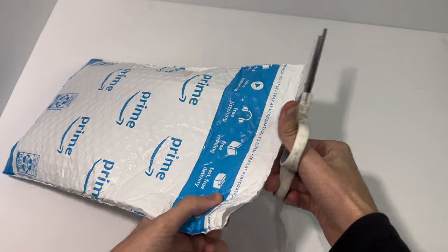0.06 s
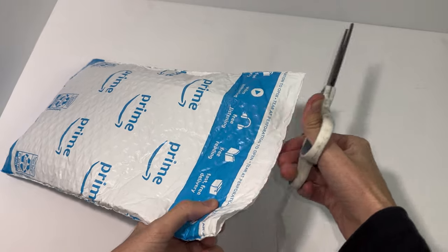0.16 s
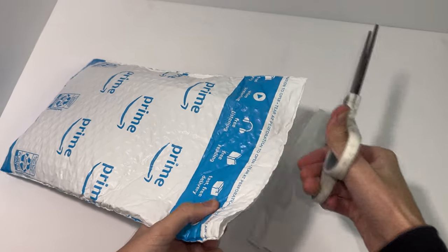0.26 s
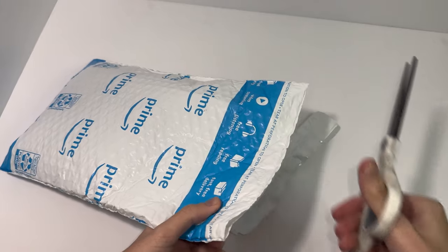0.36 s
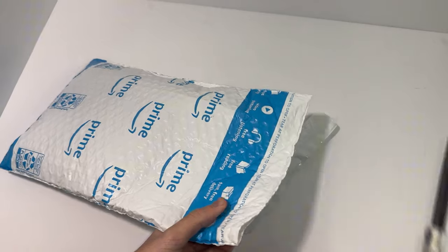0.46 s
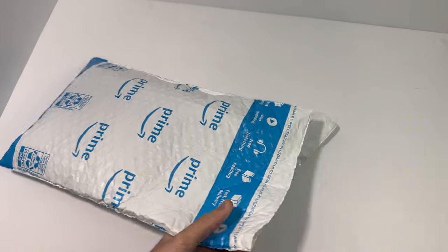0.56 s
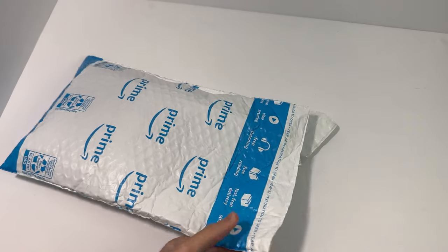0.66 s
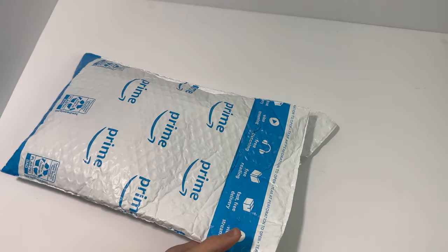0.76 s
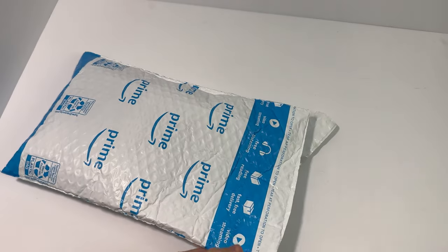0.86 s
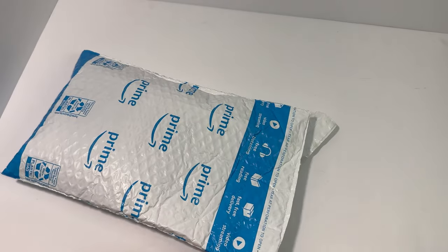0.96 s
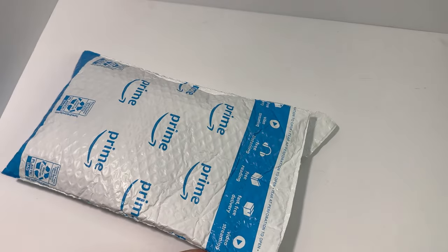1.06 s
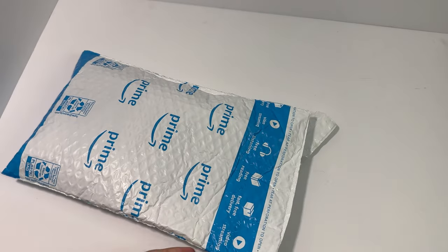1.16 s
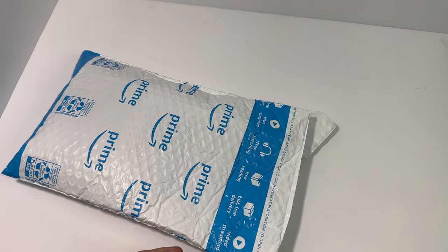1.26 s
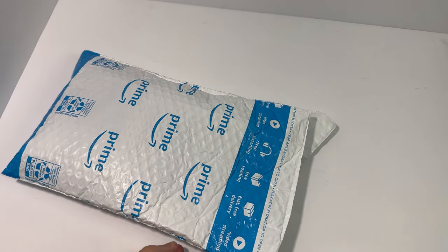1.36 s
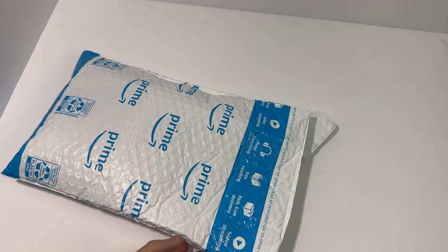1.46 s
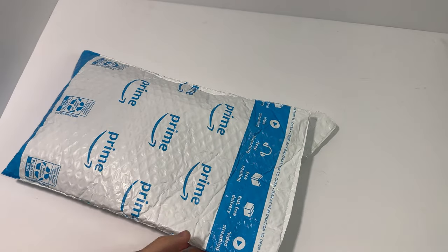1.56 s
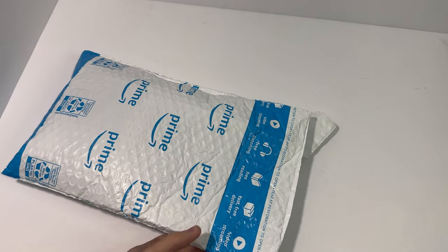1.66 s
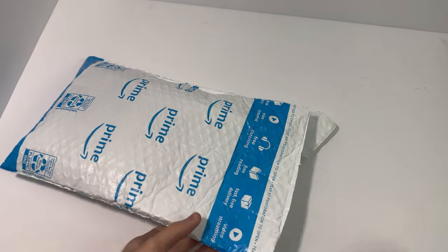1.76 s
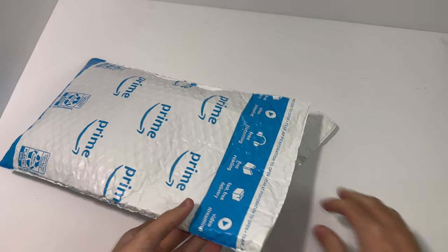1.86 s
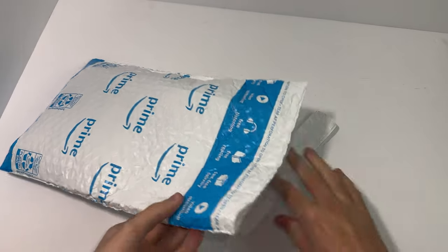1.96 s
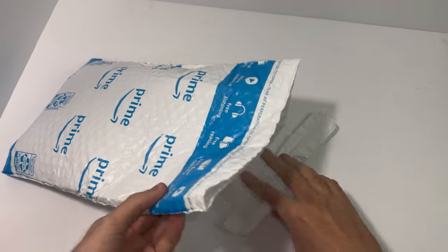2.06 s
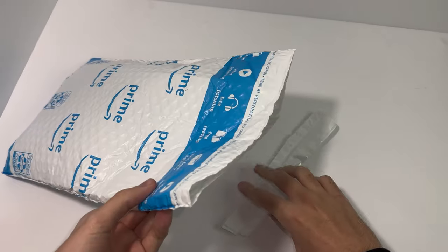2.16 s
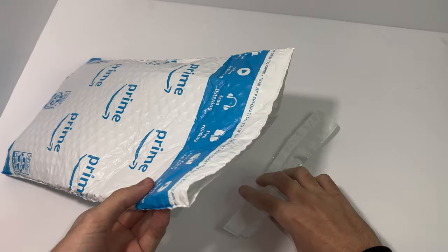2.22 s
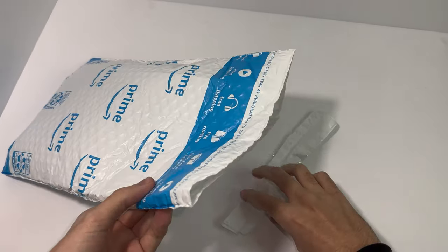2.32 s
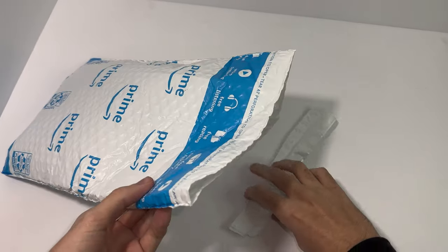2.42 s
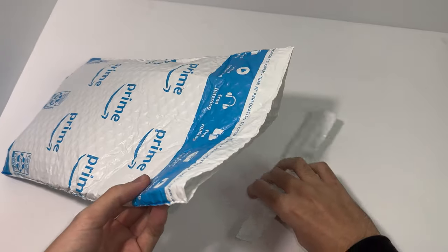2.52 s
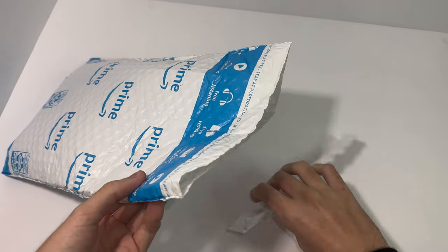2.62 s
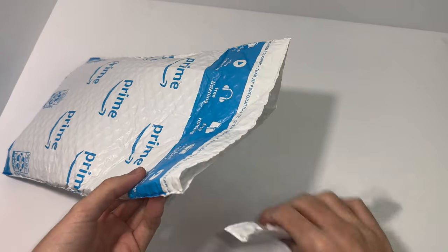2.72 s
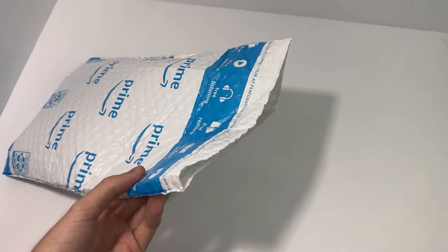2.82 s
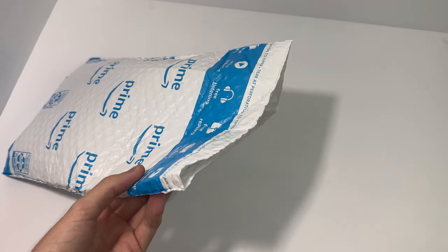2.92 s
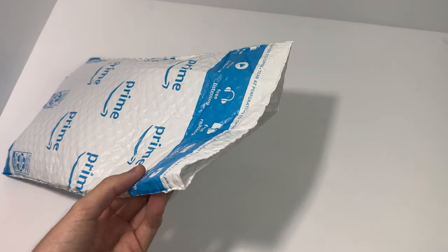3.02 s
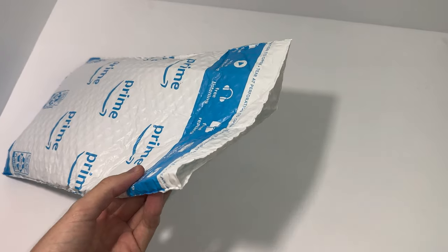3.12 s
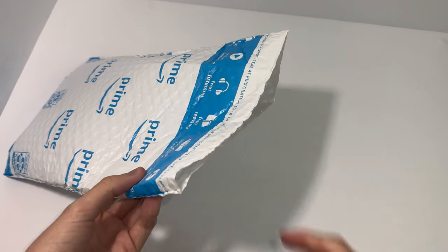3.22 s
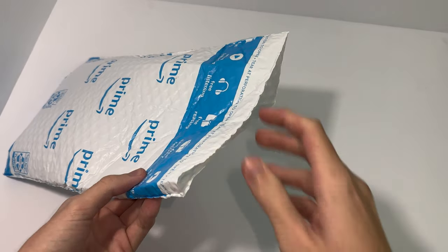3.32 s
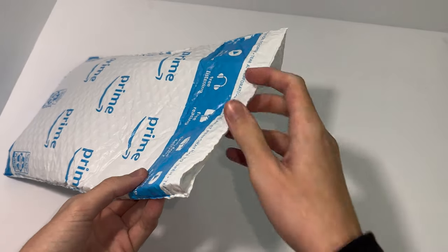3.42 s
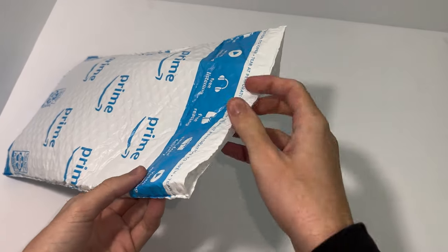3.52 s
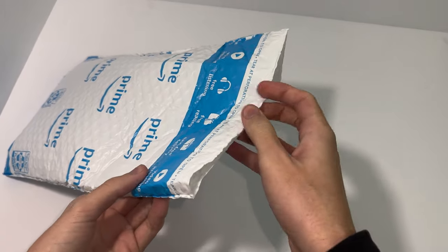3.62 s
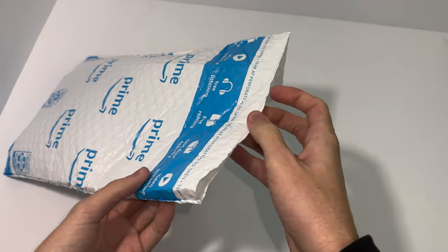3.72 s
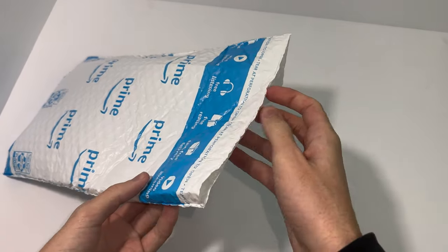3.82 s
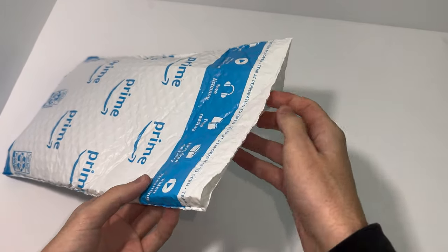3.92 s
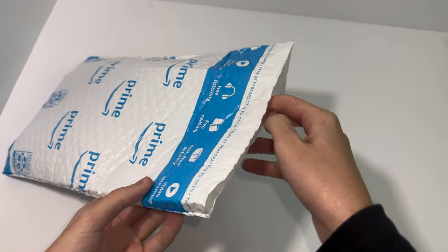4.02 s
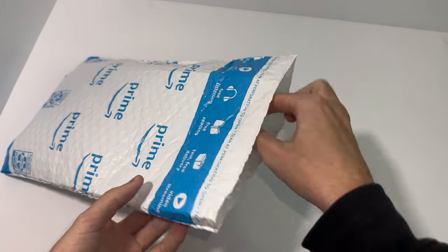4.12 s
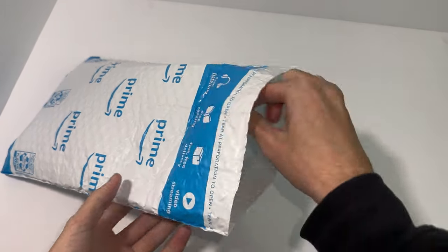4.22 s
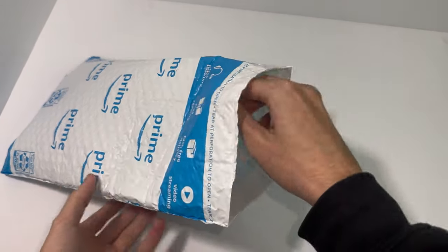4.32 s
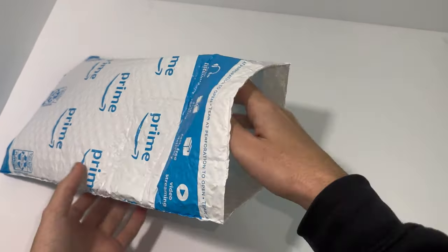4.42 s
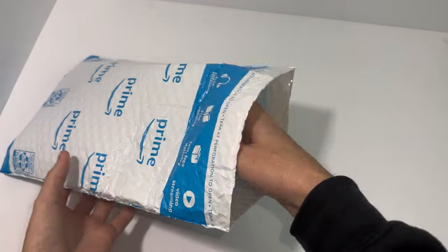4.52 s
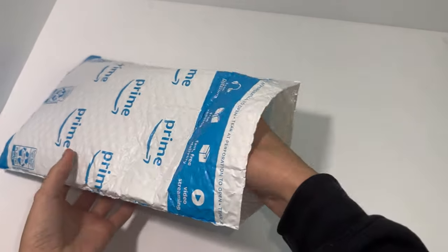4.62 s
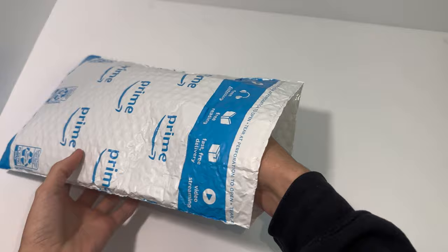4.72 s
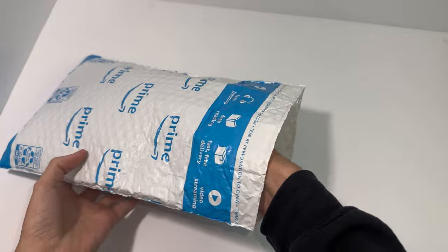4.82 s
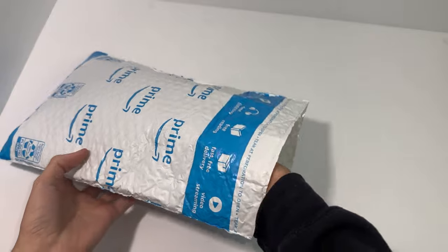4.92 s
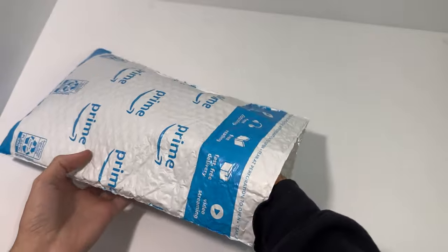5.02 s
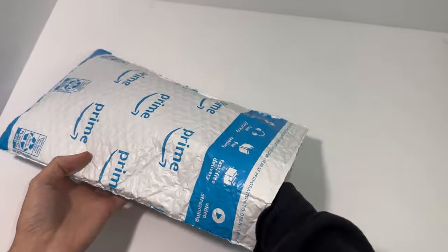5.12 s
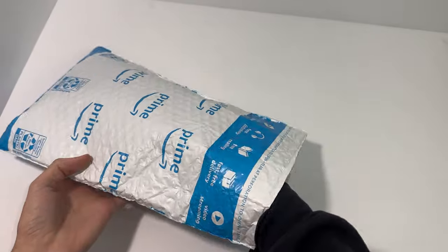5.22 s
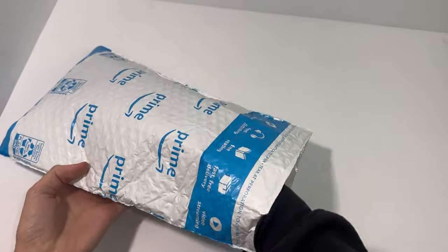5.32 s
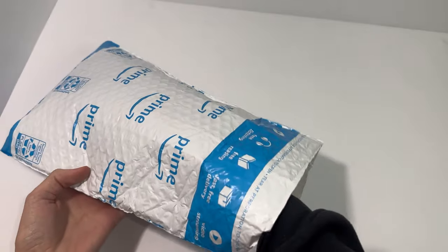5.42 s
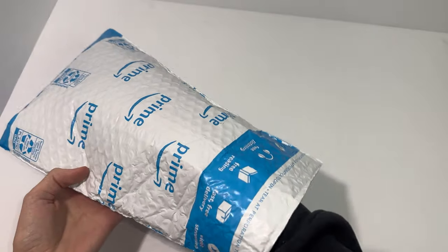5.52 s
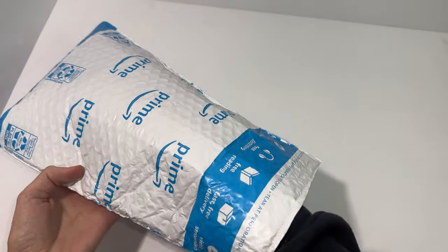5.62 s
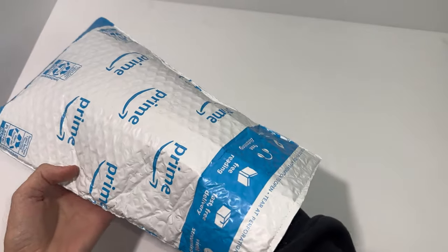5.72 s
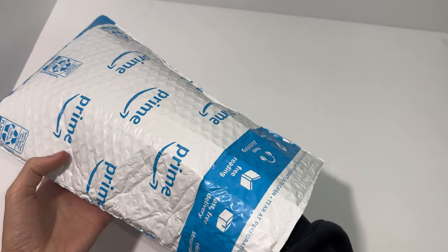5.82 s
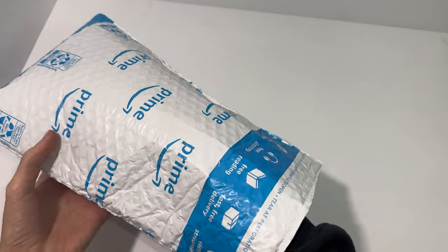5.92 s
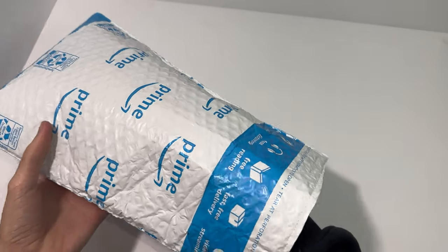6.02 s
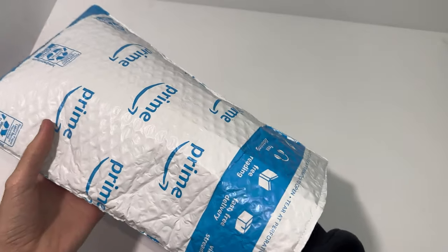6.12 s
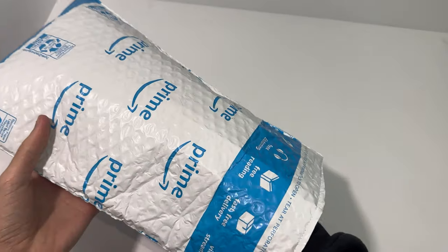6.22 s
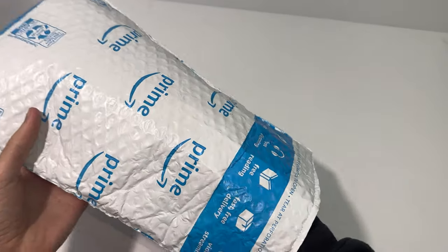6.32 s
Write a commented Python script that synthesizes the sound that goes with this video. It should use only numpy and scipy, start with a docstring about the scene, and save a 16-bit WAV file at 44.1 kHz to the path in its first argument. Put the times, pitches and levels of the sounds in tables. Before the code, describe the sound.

A padded plastic mailer is handled close to the microphones, with crisp snaps, small hollow pops and light crinkling that thin out by about 1 second. At 1.3 seconds scissors are put down on a table with a loud double thump, followed at 1.5 seconds by a low knock, the tabletop ringing briefly. Crinkling returns around 1.8 seconds, then drops to sparse ticks and faint rubbing. From about 3.4 seconds a hand opens the bag in short bursts of crackling and sharp snaps. From 4.8 seconds a sleeved arm slides inside, making a denser, continuous rustle, with cloth rubbing over the bubbles and the padding popping. The sharpest snaps come near 5.4 seconds, and the rustle carries on until the end at about 6.4 seconds. The room is small, with a short echo and a low, steady ventilation hum.

```python
"""Padded plastic mailer, handled over a table: creases snap, panels buckle, the film crinkles and rubs.
Scissors are put down at 1.3 s: a loud double thump and a knock ring the table's low modes.
A hand opens the bag; from 4.8 s a sleeved arm slides in and pulls the film taut.
Small room with ventilation hum, heard at two close microphones."""
import sys
import numpy as np
from scipy import signal
from scipy.fft import rfft, irfft, next_fast_len
from scipy.io import wavfile
from scipy.ndimage import uniform_filter1d

SR = 44100
rng = np.random.default_rng(int(sys.argv[2]) if len(sys.argv) > 2 else 0)


def generate_wav(signal):
    """Clip the signal to [-1, 1] and save it as 16-bit WAV at the path in sys.argv[1]."""
    frames = np.transpose(np.atleast_2d(signal))
    scaled = np.clip(frames, -1, 1) * 32767
    pcm = np.round(scaled).astype(np.int16)
    wavfile.write(sys.argv[1], SR, pcm)


N = 280917

# Main crease snaps: t/s, level/dB, tilt/(dB/octave)
CREASE_SNAPS = [(0.0554, -17, -1.5), (0.105, -24.5, 11), (0.1334, -31, 9), (0.1716, -17.5, -4),
                (0.226, -33, -1), (0.268, -22, -2), (0.277, -26, 2), (0.349, -27, -6.5), (0.3634, -36, -1),
                (0.3842, -25.5, -3), (0.402, -33, -3), (0.421, -26.5, 3.5), (0.4514, -25, -2.5),
                (0.476, -26.5, 2), (0.4994, -24, -4), (0.521, -20, 2), (0.555, -27.5, -5.5),
                (0.575, -28, -1), (0.6878, -33, -1.5), (0.733, -32.5, -1.5), (0.789, -29.5, -3),
                (0.893, -33, -3), (0.912, -37, -3), (0.975, -37.5, -2.5), (0.987, -31, -4.5),
                (1.0823, -24.5, 5.5), (1.4085, -43, -10), (1.439, -44.5, 1), (1.531, -34, 0),
                (1.6925, -30, -5.5), (1.723, -32, -1), (1.847, -21, 3), (1.883, -22, 0.5), (1.971, -23, 7),
                (1.98, -23.5, -1.5), (2.08, -24.5, -2), (2.38, -30, -4), (2.489, -31.5, -4.5),
                (2.624, -32.5, 0.5), (2.678, -33.5, 7), (2.8404, -29.5, -3), (2.966, -33.5, -4),
                (3.0, -29, -0.5), (3.095, -35, -12), (3.1458, -43.5, 1), (3.364, -32, -5), (3.3862, -23, 8),
                (3.394, -21, 18), (3.41, -16, 2), (3.552, -26.5, 2.5), (3.6161, -28, 2), (3.6965, -24, 4),
                (3.831, -27.5, -2.5), (4.0847, -15.5, 9), (4.156, -22.5, 1), (4.1782, -24, 12),
                (4.2075, -29, -8), (4.3207, -23, 2.5), (4.3615, -27, -4), (4.414, -23.5, -2.5),
                (4.4445, -22.5, 0), (4.4866, -25.5, 2), (4.5, -25.5, 1), (4.698, -21, -4), (5.012, -19, -3),
                (5.0757, -24, -1), (5.3528, -17, 6), (5.359, -12.5, 11), (5.4028, -15, -3),
                (5.435, -19.5, -5.5), (5.482, -20, -7), (5.728, -26, 3), (5.9115, -18, -3.5),
                (5.917, -20, 0), (5.977, -25, -8), (6.277, -25, -1)]
# Buckling panels, and at 4.11 s the bag bumping on the table: t/s, level/dB, f/Hz
PANEL_BUCKLES = [(0.054, -28, 383), (0.067, -31, 127), (0.174, -29.5, 322), (0.575, -24.5, 1190),
                 (2.082, -31.5, 1090), (2.429, -43, 288), (3.46, -39, 358), (4.085, -28, 914),
                 (4.097, -34, 259), (4.112, -36.5, 140), (4.197, -29.5, 1170), (4.698, -36, 1300),
                 (4.798, -33, 428), (5.102, -29, 654), (5.322, -27.5, 820), (5.772, -21.5, 1190),
                 (5.787, -26.5, 445), (6.028, -34, 433), (6.178, -26, 1640)]
# Hand moves (steady, lift, pinch open): t/s, rise/s, length/s, crinkle/dB, rub/dB
HAND_MOVES = [(0.0, 0.0014, 0.26, -55, -51), (0.34, 0.081, 0.28, -48.5, -51.5),
              (0.657, 0.038, 0.17, -56.5, -54.5), (0.835, 0.013, 0.18, -68, -60),
              (1.712, 0.026, 0.33, -67.5, -53), (1.826, 0.0089, 0.25, -43.5, -48.5),
              (2.227, 0.0073, 0.27, -60, -58), (2.487, 0.073, 0.081, -49.5, -49),
              (2.668, 0.0088, 0.078, -59.5, -54), (2.897, 0.43, 0.39, -66, -54),
              (3.375, 0.018, 0.074, -38, -40.5), (3.477, 0.039, 0.071, -44, -44),
              (3.622, 0.024, 0.08, -52.5, -51.5), (3.871, 0.012, 0.023, -46.5, -47),
              (3.956, 0.066, 0.075, -46.5, -47), (4.027, 0.042, 0.07, -36, -37.5),
              (4.138, 0.049, 0.1, -35.5, -39), (4.242, 0.023, 0.092, -43.5, -46),
              (4.363, 0.045, 0.13, -43.5, -42.5), (4.526, 0.05, 0.11, -40.5, -43),
              (4.61, 0.074, 0.11, -33, -36), (4.768, 0.016, 0.039, -45.5, -44),
              (5.853, 0.04, 0.043, -33.5, -52)]
# Arm pushing in, one stroke: t/s, crinkle/dB, rub/dB
ARM_PUSH = [(4.832, -43.5, -46), (4.87, -37.5, -38.5), (5.28, -34, -37.5), (5.35, -33, -31),
            (5.41, -34.5, -37), (5.72, -39, -34.5), (5.9, -36, -34), (6.05, -39.5, -35.5),
            (6.12, -39.5, -41), (6.37, -40.5, -36.5)]
# Brief swells (skids, and the bag's hollow ring after a pop): t/s, length/s, level/dB, f/Hz
SWELLS = [(0.366, 0.37, -52.5, 4200), (0.573, 0.045, -43.5, 1050), (2.498, 0.13, -51, 8900),
          (3.929, 0.081, -43, 744), (5.503, 0.16, -36.5, 1670), (5.989, 0.091, -46.5, 414)]
# Film spectrum: f/Hz, level/dB
FILM_SPECTRUM = [(200, -14), (800, -5), (2000, -2), (4000, 0), (7000, 2.5), (10800, 3.5), (12500, -7),
                 (15700, -3), (17000, -79)]
# Friction spectrum: f/Hz, level/dB
RUB_SPECTRUM = [(100, -19.5), (300, -3), (550, -7.5), (900, -1), (1700, -4.5), (2800, -7), (5000, -11.5),
                (10000, -16), (16000, -70)]
# Scissors on table: t/s, ring/dB, softness/(dB/octave off the main mode), thud/dB, crack/dB
SCISSOR_BLOWS = [(1.2662, -17.5, -0.5, -19.5, -21), (1.2949, -14, 0, -15.5, -17),
                 (1.5039, -12, 27, -25.5, -40)]
# Table-top modes: f/Hz, level/dB, t60/s
TABLE_MODES = [(82, 5.5, 0.11), (126, -2, 0.12), (143.6, 1, 0.18), (170.7, -2.5, 0.24), (203, -1.5, 0.2),
               (249, 0, 0.16), (345, 2.5, 0.1), (445, 0.5, 0.087), (665, -10, 0.094), (810, -20, 0.036)]
# Bending-wave bands: f/Hz, level/dB
THUD_BANDS = [(72, -9), (180, -6), (330, -2), (700, -3.5), (1250, -12)]
# Contact spectrum: f/Hz, level/dB
CRACK_SPECTRUM = [(200, -42), (700, 10), (1400, 9.5), (2700, 2.5), (4500, -8.5), (7500, -9), (11000, -24.5),
                  (16000, -38)]
# Room decay: f/Hz, t60/s
ROOM_T60 = [(100, 0.28), (500, 0.36), (2000, 0.27), (6000, 0.22), (15000, 0.11)]
# Ventilation spectrum: f/Hz, level/dB
HUM_SPECTRUM = [(20, -14), (35, -5.5), (48, 5), (65, 3.5), (90, -10.5), (120, -1), (143, 4.5), (170, -5),
                (215, -8.5), (275, -9.5), (330, -14.5), (700, -24), (2500, -37.5), (10000, -86),
                (16000, -68)]
# Left-right coherence: f/Hz, coherence/1
COHERENCE = [(60, 0.94), (200, 0.98), (600, 0.14), (1500, 0.66), (3000, 0.38), (5500, 0.28), (7000, 0.52),
             (9000, 0.96), (16000, 0.056)]
# Left-right phase offset, widens the stereo image: f/Hz, left lead/rad
STEREO_PHASE = [(0, 0), (1380, 0.6), (2760, -1.0), (3450, -1.4), (4310, -0.4), (5600, -1.6), (6720, -0.1),
                (7410, 0.1), (8010, 2.8), (9560, 3.5), (10300, 6.1), (12000, 6.4), (12800, 9.3),
                (14000, 9.5), (14800, 12.5), (16600, 12.6)]

CRINKLE, RUB = 0, 1  # order of the paired level columns


def snaps(gain_db=-1, tick_s=0.00024, pull=0.55, lag_s=0.0024, decay_s=0.0015, pivot_hz=4000, size=2048):
    """A crease flips with a tick and pulls three neighbours over; its two facets ring."""
    out, t, hz = np.zeros((2, N)), np.arange(size) / SR, bins(size)
    octaves = np.log2(np.maximum(hz, 1000) / pivot_hz)
    for start_s, db, tilt in CREASE_SNAPS + stray_snaps():
        age_s = t - lag_s * rng.random((3, 1))
        neighbour_power = ((age_s > 0) * np.exp(-2 * abs(age_s) / decay_s)).sum(0)
        envelope = np.sqrt(np.exp(-2 * t / tick_s) + pull ** 2 * neighbour_power)
        facet_hz = pivot_hz * 2 ** rng.standard_normal((2, 1))
        facets_db = hump(hz, facet_hz, octaves=0.25, height_db=6).sum(0)
        curve_db = lookup(FILM_SPECTRUM, hz) + tilt * octaves + facets_db
        add(out, start_s, gain_of(db + gain_db) * burst(envelope, curve_db))
    return out


def stray_snaps(rate_per_s=12, over_db=15, spread_db=4, cap_db=-31):
    """Lesser creases give at random, louder with harder handling; rows as CREASE_SNAPS."""
    count = round(rate_per_s * N / SR)
    at = rng.integers(0, N, count)
    force_db = 20 * np.log10(handling(CRINKLE) * slack() ** 3)
    level_db = np.minimum(force_db[at] + rng.normal(over_db, spread_db, count), cap_db)
    tilt_db_per_octave = rng.normal(4.5, 3, count)
    return list(zip(at / SR, level_db, tilt_db_per_octave))


def buckles(gain_db=7, rise_s=0.0021, crossover_hz=260, size=8192):
    """A padded panel pops: large ones ring as a damped note, small stiff ones puff in a narrower band."""
    out, t, hz = np.zeros((2, N)), np.arange(size) / SR, bins(size)
    padding_db = lookup([(30, -29), (200, 6.5), (2000, -6), (16000, -8)], hz)
    for start_s, db, centre_hz in PANEL_BUCKLES:
        decay_s = 0.00295 + 1.23 / centre_hz
        envelope = (1 - np.exp(-t / rise_s)) * np.exp(-t / decay_s)
        octaves = 2.53 * np.sqrt(crossover_hz / centre_hz)
        puff = burst(envelope, padding_db + hump(hz, centre_hz, octaves, height_db=30))
        note = envelope * np.sqrt(2) * np.sin(2 * np.pi * centre_hz * t)
        note_share = 1 / (1 + (centre_hz / crossover_hz) ** 2)
        pop = np.sqrt(1 - note_share) * puff + np.sqrt(note_share) * note
        add(out, start_s, gain_of(db + gain_db) * pop)
    return out


def crinkle(gain_db=-2, base_rate_per_s=2300, spread_db=5, clump_db=5.5, decay_s=0.0016, bands=24, size=512):
    """Swarms of tiny creases tick, each in one band; harder handling sets off more."""
    out, t, hz = np.zeros((2, N)), np.arange(size) / SR, bins(size)
    force = handling(CRINKLE)
    chance = base_rate_per_s / SR * (force / force.max()) ** 1.1
    tick_db = spread_db * np.minimum(rng.exponential(1, N), 4) + clump_db * wander(95)
    ticks = (rng.random(N) < chance / slack()) * gain_of(slack() * tick_db)  # taut: denser, more even
    # the creases share the hand's work
    ticks *= force / np.sqrt(abs(uniform_filter1d(ticks ** 2, size=4000)) + chance)
    band = rng.integers(0, bands, N)
    for k, centre_hz in enumerate(np.geomspace(2000, 14000, bands)):
        curve_db = lookup(FILM_SPECTRUM, hz) + hump(hz, centre_hz, octaves=0.14, height_db=13)
        grain = burst(np.exp(-t / decay_s), curve_db)
        grain /= np.linalg.norm(grain[0])
        out += signal.oaconvolve((ticks * (band == k))[None], grain, axes=1)[:, :N]
    return gain_of(gain_db) * out


def rubbing(slip_db=3.5, catch_db=4.5, hiss_db=-12):
    """Skin and cloth catch and slip over the bubbles; smooth film adds hiss."""
    stick_slip = gain_of(slack() * (slip_db * wander(185) + catch_db * wander(34)))
    stick_slip /= np.sqrt(uniform_filter1d(stick_slip ** 2, size=8000))
    friction = handling(RUB) * steady_noise(RUB_SPECTRUM)
    hiss = gain_of(hiss_db) * handling(CRINKLE) * steady_noise(FILM_SPECTRUM)
    return (friction + hiss) * stick_slip


def swells(flutter_db=2):
    """Brief band-limited swells: skids, and the bag's hollow ring after a pop."""
    out = np.zeros((2, N))
    for start_s, length_s, db, centre_hz in SWELLS:
        size = 2 * int(length_s * SR / 2)
        hz = bins(size)
        envelope = np.sqrt(np.hanning(size)) * gain_of(flutter_db * wander(220)[:size])
        band_db = hump(hz, centre_hz, octaves=0.92, height_db=30) - 10 * np.log10(hz + centre_hz)
        add(out, start_s, gain_of(db) * burst(envelope, band_db))
    return out


def flexing(x, depth_db=2):
    """The bag's folds change shape, so resonances come and go."""
    spectra = signal.stft(x, nperseg=512)[2]
    patches = uniform_filter1d(rng.standard_normal(spectra.shape[1:]), size=5, axis=0)
    patches = unit_rms(uniform_filter1d(patches, size=7, axis=1))
    return signal.istft(spectra * unit_rms(gain_of(depth_db * patches)), nperseg=512)[1][:, :N]


def handling(layer, rest_db=(-83, -63.5), ease_db=4, settle_s=0.022):
    """Drive amplitude of CRINKLE or RUB: creep at rest, arm push, hand moves that grip and ease off."""
    t, push = np.arange(N) / SR, np.array(ARM_PUSH)
    arm = (t > push[0, 0]) * gain_of(np.interp(t, push[:, 0], push[:, 1 + layer]))
    power = gain_of(rest_db[layer]) ** 2 + arm ** 2
    for start_s, rise_s, length_s, *levels_db in HAND_MOVES:
        age_s = t - start_s
        attack = np.clip(age_s / rise_s, 0, 1)
        hold = gain_of(levels_db[layer] + ease_db * (1 - np.clip(age_s / length_s, 0, 1)))
        release = np.exp(-np.maximum(age_s - length_s, 0) / settle_s)
        power += (attack * hold * release) ** 2
    return np.sqrt(power)


def slack(taut=0.62):
    """The film's freedom to buckle: 1 until the arm enters."""
    return np.where(np.arange(N) / SR < ARM_PUSH[0][0], 1, taut)


def table_thumps(rise_s=0.0068, align_s=0.0115, main_hz=235, width=0.15, size=22050):
    """The top thuds and rings; its modes fall into step a few milliseconds after each blow."""
    out, t = np.zeros((2, N)), np.arange(size) / SR
    for start_s, ring_db, softness, thud_db, _ in SCISSOR_BLOWS:
        modes = np.zeros(size, complex)
        for hz, db, t60_s in TABLE_MODES:
            envelope = gain_of(db - softness * abs(np.log2(hz / main_hz)) - 60 * t / t60_s)
            modes += envelope * np.exp(2j * np.pi * hz * (t - align_s))
        modes *= 1 - np.exp(-t / rise_s)
        ring = modes.imag + width * np.array([[-1], [1]]) * modes.real
        add(out, start_s, gain_of(ring_db) * ring + gain_of(thud_db) * thud(size))
    return out


def thud(size):
    """Bending waves in the top: high bands peak and die first."""
    out, t = np.zeros((2, size)), np.arange(size) / SR
    for band_hz, db in THUD_BANDS:
        peak_s = 0.0041 * np.sqrt(500 / band_hz)
        envelope = t / peak_s * np.exp(1 - t / peak_s)
        out += gain_of(db) * burst(envelope, hump(bins(size), band_hz, octaves=1.44, height_db=80))
    return out


def scissor_cracks(decay_s=0.003, size=4096):
    """Hard contact at the start of each blow."""
    out, t = np.zeros((2, N)), np.arange(size) / SR
    for start_s, *_, crack_db in SCISSOR_BLOWS:
        crack = burst(np.exp(-t / decay_s), lookup(CRACK_SPECTRUM, bins(size)))
        add(out, start_s, gain_of(crack_db) * crack)
    return out


def room(x, onset_s=0.0023, size=22050):
    """Small-room echo; treble dies first."""
    hz, t, spectra = signal.stft(noise_pair(size), SR, nperseg=256)
    decay = gain_of(-60 * t / lookup(ROOM_T60, hz)[:, None])
    tail = signal.istft(spectra * decay, SR, nperseg=256)[1]
    tail *= np.clip(np.arange(tail.shape[1]) / SR / onset_s, 0, 1) ** 2
    return signal.fftconvolve(x.mean(0)[None], tail / np.linalg.norm(tail[0]), axes=1)[:, :N]


def ventilation(level_db=-42):
    """Steady low hum of noise."""
    return gain_of(level_db) * steady_noise(HUM_SPECTRUM)


def burst(envelope, curve_db):
    """Stereo noise burst, minimum-phase filtered, at the envelope's rms."""
    log_gain = np.log(gain_of(np.maximum(curve_db, -100)))
    mirrored = np.r_[log_gain, log_gain[-2:0:-1]]
    response = np.exp(np.conj(signal.hilbert(mirrored)))[:len(log_gain)]
    coloured = irfft(rfft(noise_pair(len(envelope)) * envelope) * response)
    return unit_rms(coloured) * np.sqrt(np.mean(envelope ** 2))


def steady_noise(spectrum):
    """Stereo noise of a given spectrum, rms 1."""
    size = 2 * next_fast_len(N // 2 + 1)
    response = gain_of(lookup(spectrum, bins(size)))
    return unit_rms(irfft(rfft(noise_pair(size)) * response)[:, :N])


def noise_pair(size):
    """White noise, partly coherent between two close microphones."""
    a, b = rfft(rng.standard_normal((2, size)))
    coherence = lookup(COHERENCE, bins(size))
    mid, side = a * np.sqrt((1 + coherence) / 2), b * np.sqrt((1 - coherence) / 2)
    return irfft([mid + side, mid - side], size)


def wander(corner_hz):
    """Low-passed random curve, rms 1."""
    return unit_rms(irfft(rfft(rng.standard_normal(N)) / (1 + (bins(N) / corner_hz) ** 4), N))


def hump(hz, centre_hz, octaves, height_db):
    """Bell-shaped resonance in dB."""
    return height_db * np.exp(-0.5 * (np.log2((hz + 1) / centre_hz) / octaves) ** 2)


def lookup(points, hz):
    """Table value on a log-frequency axis."""
    points_hz, values = np.transpose(points)
    return np.interp(np.log(hz + 1), np.log(points_hz + 1), values)


def add(mix, start_s, sound):
    """Mix in a stereo sound."""
    part = mix[:, round(start_s * SR):][:, :sound.shape[1]]
    part += sound[:, :part.shape[1]]


def bins(size):
    """FFT frequencies in Hz."""
    return np.fft.rfftfreq(size, 1 / SR)


def gain_of(db):
    """dB to amplitude."""
    return 10 ** (np.asarray(db) / 20)


def unit_rms(x):
    """Scale to rms 1."""
    return x / np.sqrt(np.mean(x ** 2) + 1e-20)


def scene(bag_send_db=-10, table_send_db=-19, crack_send_db=-14):
    """Bag, table and scissors with room echo, over the hum."""
    bag = snaps() + buckles() + crinkle() + flexing(rubbing() + swells())
    table, cracks = table_thumps(), scissor_cracks()
    send = gain_of(bag_send_db) * bag + gain_of(table_send_db) * table + gain_of(crack_send_db) * cracks
    return bag + table + cracks + room(send) + ventilation()


def record(dry, trim_db=0.5, cutoff_hz=16550):
    """Left-right phase offset by frequency widens the image; then balance trim and low-pass."""
    size = next_fast_len(N + 4096)
    lead_rad = np.interp(bins(size), *np.transpose(STEREO_PHASE))
    rotation = np.exp(0.5j * lead_rad * np.array([[1], [-1]]))
    channels = irfft(rfft(dry, size) * rotation, size)[:, :N]
    channels *= gain_of([[-trim_db], [trim_db]])
    lowpass = signal.firwin(301, cutoff_hz, window=("kaiser", 9), fs=SR)
    return signal.oaconvolve(channels, lowpass[None], "same")


dry = scene()
out = record(dry)
generate_wav(out)
```